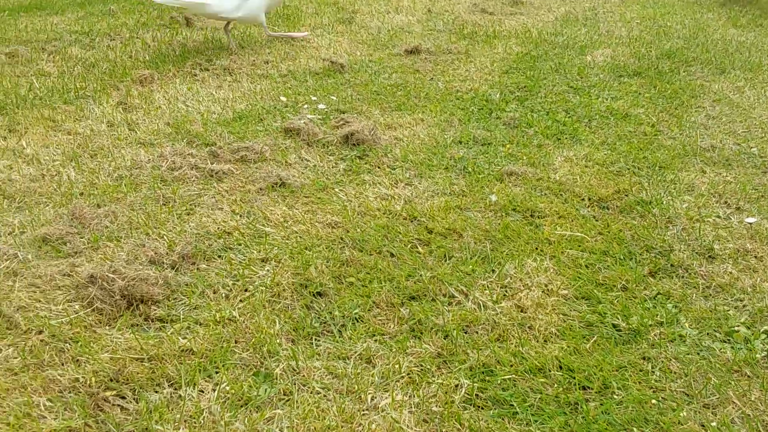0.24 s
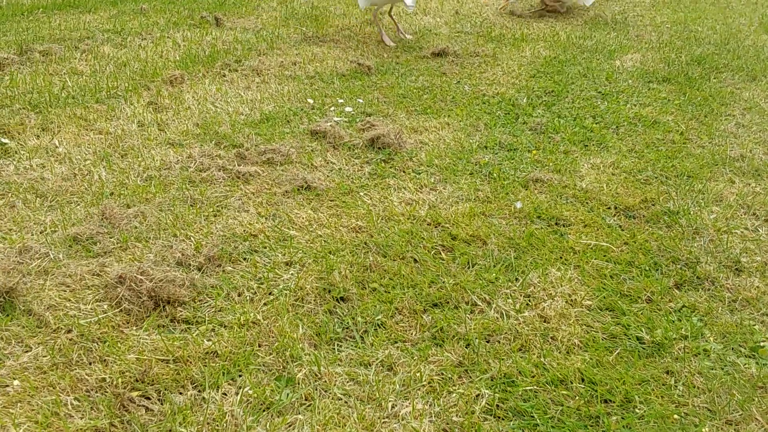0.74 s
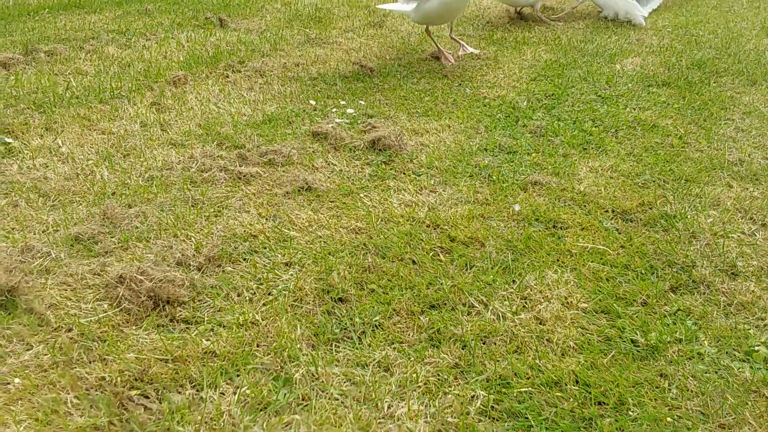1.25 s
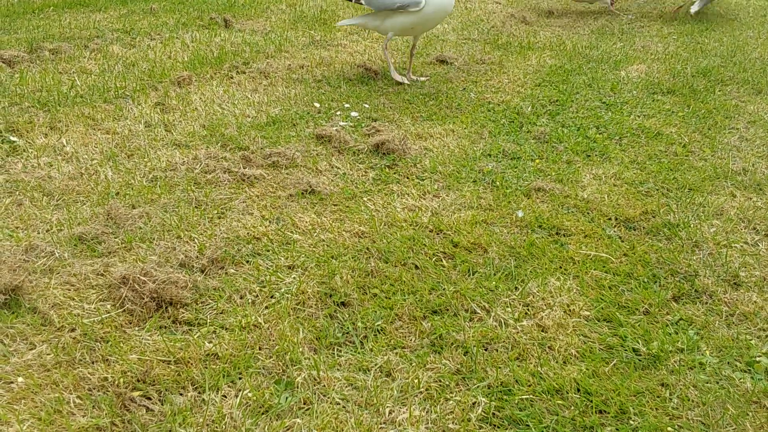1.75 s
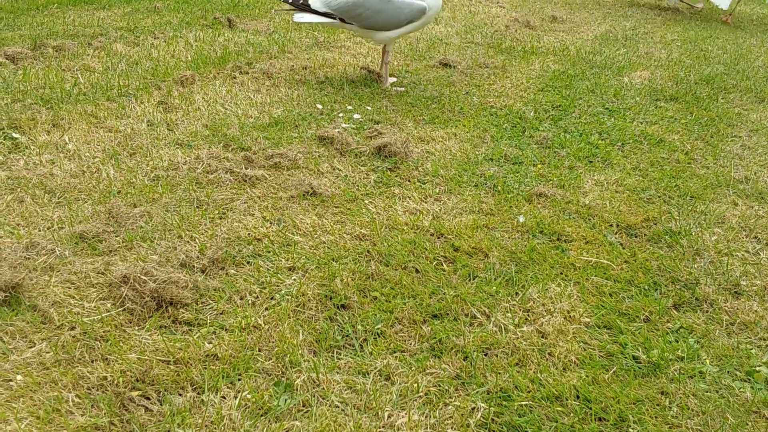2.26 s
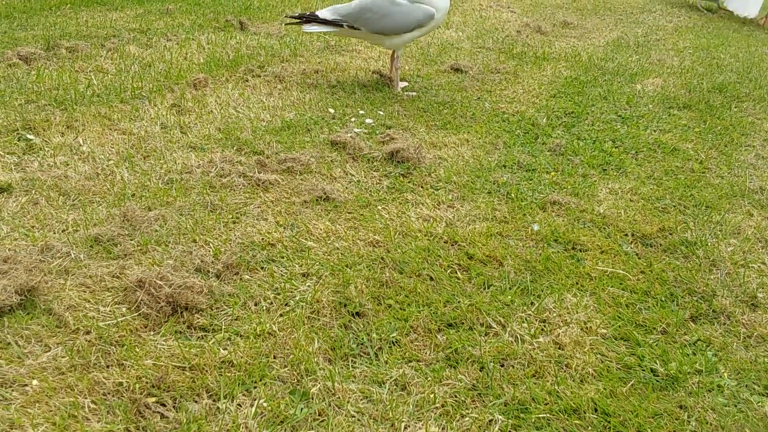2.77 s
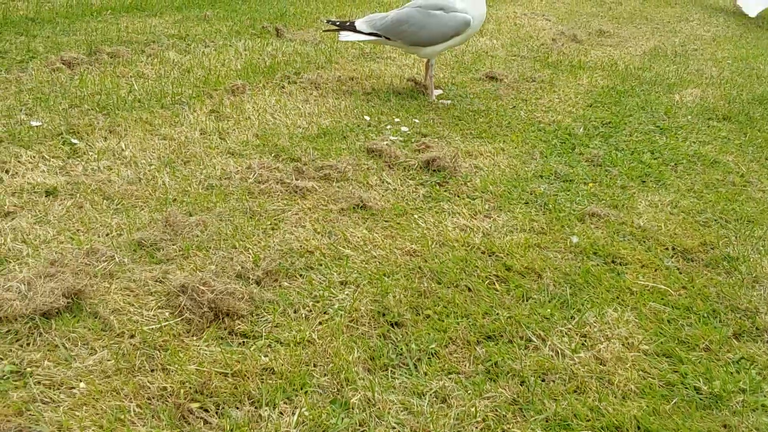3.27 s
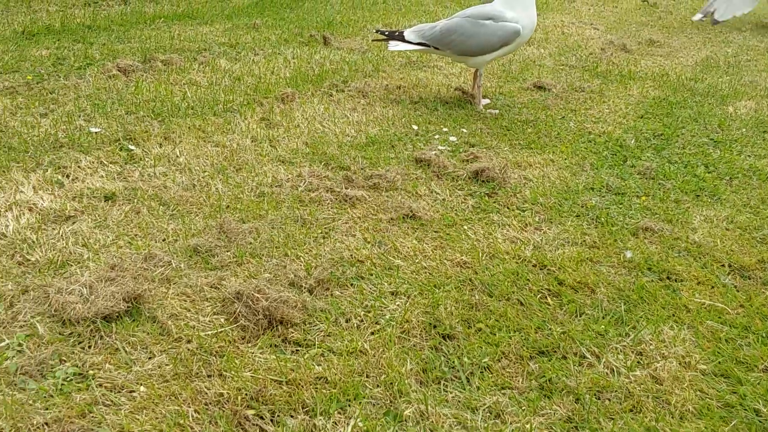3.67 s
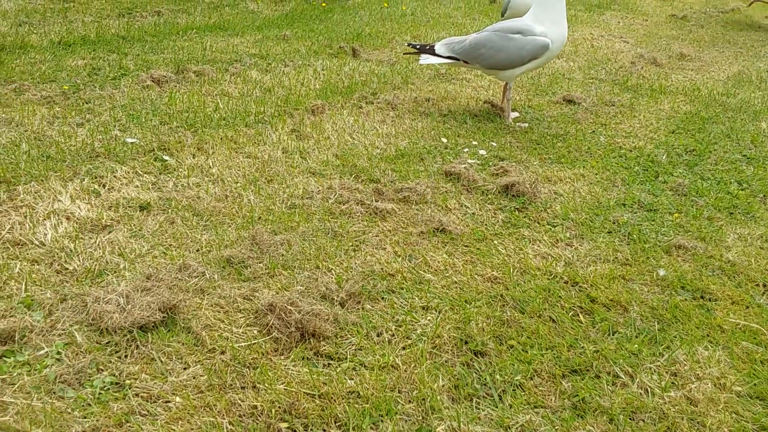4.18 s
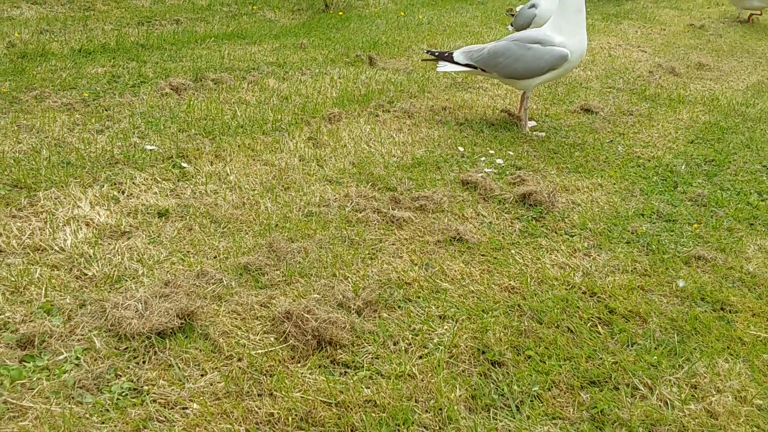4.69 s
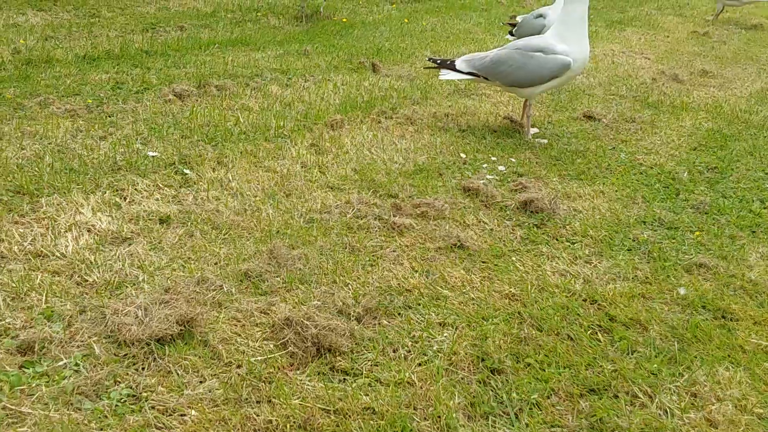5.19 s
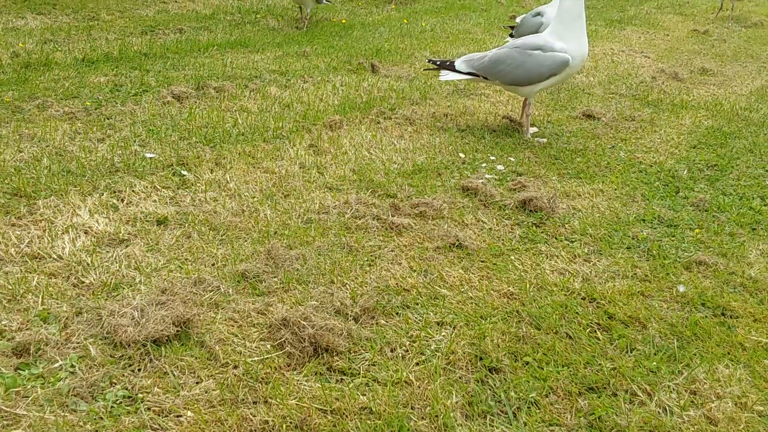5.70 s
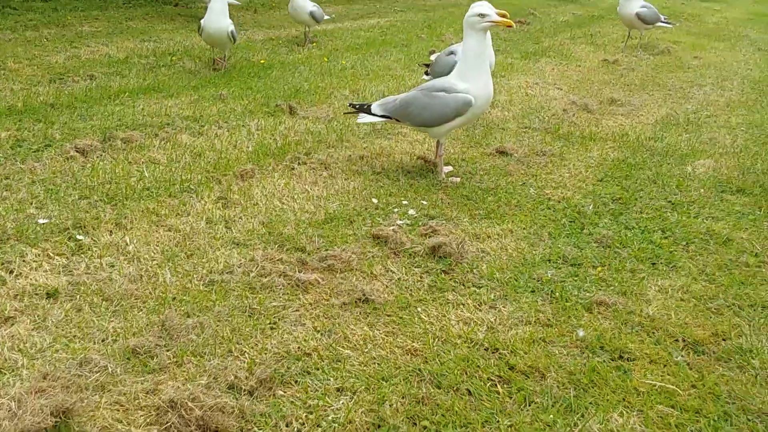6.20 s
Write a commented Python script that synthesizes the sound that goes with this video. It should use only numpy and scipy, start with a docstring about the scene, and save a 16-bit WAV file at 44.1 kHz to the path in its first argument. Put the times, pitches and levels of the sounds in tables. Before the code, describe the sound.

A nearby gull on an open lawn gives five loud, high cries at about 0.6, 1.3, 2.2, 3.5 and 5.2 seconds. Each lasts roughly a third of a second, breaking from a tiny croak into a falling scream with a slight, quick echo. At 0.9 seconds a second gull cuts in with a loud squawk that cracks downward. Softer, low mews come at 0.5 and 1.5 seconds, with brief ones between 2.6 and 3.5. Distant gulls answer around 2.6, 3 and 3.8 seconds. A faint hiss and low, distant rumble lie underneath, with scattered soft handling bumps and rustles, the rustles clearest between 3.2 and 4 seconds. From about 4.3 to 5.2 seconds a gust buffets the microphone with a deep rumble. After the last cry the background falls quieter, and one faint mew comes near 6.3 seconds.

```python
"""A low, distant rumble with soft bumps and rustles, then five loud falling cries from a gull on a lawn.
A second gull cuts in; others mew and answer from farther off, and a gust buffets the microphone late on.
Each voice is a source and a filter: the syrinx makes a harmonic tone, the throat and beak shape it.
Walls throw the cries back, so each glide beats against its own delayed echo."""
import sys
import numpy as np
from scipy import signal
from scipy.fft import rfft, irfft
from scipy.io import wavfile
from scipy.ndimage import uniform_filter1d

SR = 44100
rng = np.random.default_rng(int(sys.argv[2]) if len(sys.argv) > 2 else 0)


def transcribe(u):
    """Save the signal u as a 16-bit wav file named by the first command-line argument.

    u: samples, shape (n,) or (channels, n), limited to [-1, 1]; the rate is SR.
    q: integer samples, one column per channel.
    """
    v = np.clip(np.atleast_2d(u).T, -1, 1)
    q = np.round(v * 32767).astype(np.int16)
    wavfile.write(sys.argv[1], SR, q)


N = 284312
TIME, FREQS = np.arange(N) / SR, np.fft.rfftfreq(N, 1 / SR)
PROGRESS = np.linspace(0, 1, 200)  # from the start of a call to its end

# shading of hiss and rustles at the two microphone ports: (frequency [Hz], left minus right [dB])
HISS_SHADE = [(300, 0), (3000, 0.5), (7500, 7), (10000, -1.5), (13000, -5)]


def amp(db):
    """Amplitude ratio of a level in decibels."""
    return 10 ** (np.asarray(db) / 20)


def unit(x):
    """Normalisation to an rms of one."""
    return x / np.sqrt(np.mean(x ** 2) + 1e-20)


def read(points, hz):
    """Interpolation of a spectrum on a logarithmic frequency axis."""
    f, value = np.transpose(points)
    return np.interp(np.log(hz + 1), np.log(f + 1), value)


def add(mix, s, sound):
    """Superposition: a sound joins the mix at time s."""
    part = mix[max(round(s * SR), 0):][:len(sound)]
    part += sound[:len(part)]


def sides(balance_db):
    """Left and right gains for a level difference between the ports."""
    return amp(np.array([balance_db, -balance_db]) / 2)


def wander(count, rate_hz):
    """Random modulation: noise low-passed at the given rate."""
    f = np.fft.rfftfreq(count, 1 / SR)
    return unit(irfft(rfft(rng.standard_normal(count)) / (1 + (f / rate_hz) ** 2), count))


def noise(colour, correlation):
    """Partial coherence: coloured noise at two ports that share a common part."""
    white = rng.standard_normal((3, N))
    pair = np.sqrt(correlation) * white[2] + np.sqrt(1 - correlation) * white[:2]
    return unit(irfft(rfft(pair) * amp(read(colour, FREQS)), N))


def surging_noise(course, colour, correlation, surge_db, gain_db=3.5):
    """Amplitude modulation: noise surges at random while following a course of level and balance."""
    s, level_db, pan_db = np.transpose(course)
    carrier = noise(colour, correlation)
    carrier /= np.sqrt(uniform_filter1d(carrier ** 2, size=3000) + 1e-9)  # evens out the level
    surges = unit(amp(surge_db * wander(N, 14)))
    fade = np.clip(np.minimum(TIME - s[0], s[-1] - TIME) / 0.03 + 1, 0, 1)
    envelope = fade * amp(gain_db + np.interp(TIME, s, level_db))
    return carrier * surges * envelope * sides(np.interp(TIME, s, pan_db))


def air(flutter_db=1.6, grain_db=1.5):
    """Amplitude-modulated noise: a light, grainy hiss that sinks as the gust passes."""
    # hiss spectrum: (frequency [Hz], gain [dB])
    colour = [(120, -30), (200, -3.5), (414, -10), (554, -6.5), (1070, -17), (2560, -15), (3180, -18),
              (5910, -18), (7620, -16), (9140, -19.5), (12900, -21), (15500, -18)]
    # hiss envelope: (time [s], level [dB])
    envelope = [(0, -52), (4.2, -52.5), (5.2, -55), (5.55, -61.5), (6.18, -65), (6.45, -58.5)]
    hiss = irfft(rfft(noise(colour, correlation=0.05)) * sides(read(HISS_SHADE, FREQS)), N)
    modulation = amp(flutter_db * wander(N, 7.5) + grain_db * wander(N, 400))
    return amp(np.interp(TIME, *np.transpose(envelope))) * unit(hiss * modulation)


def distant_rumble():
    """Coherent noise: a low, distant rumble, alike at both ports, heard before the gust."""
    # course of the rumble: (time [s], relative level [dB], left minus right [dB])
    course = [(0, -55.5, 1), (1.6, -52, 0), (4.2, -49, 0.5)]
    # rumble spectrum: (frequency [Hz], gain [dB])
    colour = [(20, -42.5), (35, -10.5), (60, 2.5), (90, 2.5), (130, -3.5), (200, -7), (350, -26),
              (2000, -74)]
    return surging_noise(course, colour, correlation=0.93, surge_db=2.5)


def gust():
    """Turbulent pressure: a gust buffets each microphone port almost independently."""
    # course of the gust: (time [s], relative level [dB], left minus right [dB])
    course = [(4.22, -47.5, 1), (4.28, -37.5, 13), (4.36, -36.5, 4), (4.42, -25, -8.5), (4.52, -22.5, -1),
              (4.64, -23.5, -2.5), (4.71, -28.5, 10), (4.79, -23.5, -6), (4.96, -24.5, 2.5), (5.12, -37, 1),
              (5.22, -38.5, 10), (5.5, -56, 22.5), (5.68, -70, 14.5), (5.95, -74.5, 15), (6.1, -65.5, 14),
              (6.45, -57.5, 9)]
    # pressure spectrum: (frequency [Hz], gain [dB])
    colour = [(20, -23), (33, -17.5), (50, 1), (80, 0.5), (120, -9), (200, -22), (300, -33.5), (1200, -82)]
    return surging_noise(course, colour, correlation=0.073, surge_db=4.5)


def bumps(gain_db=-4, rise_s=0.002, t60=0.15):
    """Damped impacts: dull handling knocks, bursts of low noise that decay with no ring."""
    # knocks: (time [s], relative level [dB])
    knocks = [(0.104, -40.5), (0.265, -38), (0.463, -44), (.716, -38), (1.659, -33.5), (1.894, -45.5),
              (2.049, -40.5), (2.753, -37), (2.818, -39), (2.964, -37), (3.107, -35), (4.904, -37),
              (5.01, -37), (5.968, -56), (6.018, -52)]
    # knock spectrum: (frequency [Hz], gain [dB])
    colour = [(20, -35), (60, -9.5), (170, 9), (350, 0), (650, 0), (1200, -11.5), (2500, -24.5),
              (16000, -54.5)]
    envelope = np.zeros(N)
    for s, peak_db in knocks:
        age = np.maximum(TIME - s, 0)
        envelope += amp(peak_db - 60 * age / t60) * np.minimum(age / rise_s, 1)
    return amp(gain_db) * envelope * noise(colour, correlation=0.97)


def rustles(grain_db=2.5, rise_s=0.0057, snap_t60=0.036, treble_hz=9000):
    """Friction noise: short, grainy brushing strokes add in power; a few start with a snap."""
    # strokes: (time [s], level [dB], t60 [s], treble lift [dB])
    strokes = [(.262, -48.5, 0.27, -11), (1.622, -46, 0.33, -5), (1.802, -49.5, 0.21, 7),
               (2.039, -50.5, 0.3, 9), (2.77, -53, 0.36, 1), (2.96, -64, 0.38, 15), (3.061, -52.5, 1, -2),
               (3.242, -42, 0.68, -3), (3.457, -35.5, 0.36, -11), (3.773, -37.5, 0.33, -2),
               (3.821, -53, .2, 15), (3.916, -45, 0.36, -0.5), (3.957, -46.5, 0.25, 8.5),
               (4.68, -52.5, 0.65, 8), (4.902, -47.5, 0.31, 0), (5.804, -67, .25, 16)]
    # crisp onsets: (time [s], level [dB])
    snaps = [(0.268, -43.5), (3.244, -35.5), (3.457, -33.5), (4.468, -52)]
    # brushing spectrum: (frequency [Hz], gain [dB])
    colour = [(30, -34.5), (100, -17), (500, 5.5), (1500, -4.5), (3200, 0.5), (5500, -7), (7500, -1.5),
              (9500, -7.5), (13000, -7), (16000, -8.5)]
    body_power, treble_power = np.zeros((2, N))
    for s, stroke_db, t60, lift_db in strokes:
        age = np.maximum(TIME - s, 0)
        decay = amp(stroke_db - 60 * np.maximum(age - rise_s, 0) / t60)
        power = (decay * np.minimum(age / rise_s, 1)) ** 2
        body_power += power
        treble_power += power * amp(lift_db) ** 2
    snap_power = sum((TIME >= s) * amp(db - 60 * abs(TIME - s) / snap_t60) ** 2 for s, db in snaps)
    fizz = irfft(rfft(noise(colour, correlation=0.2)) * sides(read(HISS_SHADE, FREQS)), N)
    fizz = unit(fizz * amp(grain_db * wander(N, 300)))
    body = irfft(rfft(fizz) / (1 + (FREQS / treble_hz) ** 4), N)
    return np.sqrt(body_power + snap_power) * body + np.sqrt(treble_power + snap_power) * (fizz - body)


def reflections(direct, scatter_db, tail_db, scatter_t60=0.11):
    """Convolution with wall echoes, a short scatter off nearby things and a faint open-air tail."""
    # wall echoes: (left delay [s], right delay [s], left gain [dB], right gain [dB])
    echoes = [(.0049, 0.011, -15, -11), (0.0183, 0.016, -23, -19), (0.0309, .0304, -4.5, -9)]
    # reverberation time of the tail: (frequency [Hz], t60 [s])
    tail_t60 = [(1200, 0.54), (3000, 0.59), (14000, 0.085)]
    count = SR * 3 // 4
    taps = rng.standard_normal((2, count)) * (rng.random((2, count)) < 0.08)
    scatter = taps[:, ::-1] * amp(-60 * np.arange(count) / SR / scatter_t60)
    hz, t, spectra = signal.stft(taps, SR, nperseg=256)
    decay = amp(-60 * t / read(tail_t60, hz)[:, None])
    tail = signal.istft(spectra * decay, SR, nperseg=256)[1][:, :count]
    response = (amp(scatter_db) * unit(scatter) + amp(tail_db) * unit(tail)) / np.sqrt(count)
    for left_s, right_s, left_db, right_db in echoes:
        add(response[0], left_s, amp([left_db]))
        add(response[1], right_s, amp([right_db]))
    return signal.fftconvolve(direct[None], response, axes=1)[:, :N]


def propagate(calls, gain_db, pan_db, lag_ms, reflected_db, scatter_db, tail_db):
    """Interference: calls combine with their reflections and reach the left port a little late."""
    # shading of the ports for sound from the right: (frequency [Hz], left minus right [dB])
    shade = [(500, -3.5), (1400, -3.5), (3000, -3.5), (4000, 4.5), (4800, 5.5), (6000, 6), (8000, 4.5),
             (10000, 0.5), (15000, -5.5)]
    direct = np.zeros(N)
    for s, sound in calls:
        add(direct, s, sound)
    pressure = direct + amp(reflected_db) * reflections(direct, scatter_db, tail_db)
    spectrum = rfft(pressure) * sides(read(shade, FREQS) + pan_db)
    spectrum[0] *= np.exp(-2j * np.pi * FREQS * lag_ms / 1000)
    return amp(gain_db) * irfft(spectrum, N)


def call(contour, throat, hiss_db, treble_db=0, jitter=0.031, waver=0.0023, rasp=0.79, flicker_db=2):
    """Source and filter: a syrinx tone, its cycles uneven with roughness, is shaped by the throat."""
    s, *columns = np.transpose(contour)
    t = np.arange(s[0], s[-1], 1 / SR)
    hz, level_db, overtone_db, rough = (np.interp(t, s, c) for c in columns)
    rough, count = np.clip(rough, 0, 1), len(t)
    hz *= 1 + waver * wander(count, 36) + jitter * rough * wander(count, 450)
    phase = 2 * np.pi * np.cumsum(hz) / SR
    harmonic = np.arange(2, 13)[:, None]
    # the upper overtones flicker independently, and weaken when the beak points away
    upper_db = treble_db + flicker_db * np.array([wander(count, 26) for _ in harmonic])
    weight = amp(read(throat, harmonic * hz) + (harmonic > 2) * upper_db) * (harmonic * hz < SR / 2)
    overtones = (weight * np.cos(harmonic * phase)).sum(0) / np.linalg.norm(weight, axis=0)
    # rasp shakes the overtones while the fundamental stays firm
    overtones *= (1 + rough * rasp * wander(count, 400)) / np.sqrt(1 + (rasp * rough) ** 2)
    # period doubling: strong and weak cycles alternate, adding a line an octave down
    subharmonic = amp(-8) * rough * np.cos(phase / 2)
    tone = np.cos(phase) + subharmonic + amp(overtone_db) * overtones
    tone *= np.sqrt(2 / (1 + amp(overtone_db) ** 2))
    # air escapes in a puff with every cycle
    throat_gain = amp(read(throat, np.fft.rfftfreq(count, 1 / SR)))
    hiss = unit(irfft(rfft(rng.standard_normal(count)) * throat_gain, count))
    puffs = amp(hiss_db) * rough * hiss * (1 + np.cos(phase))
    return s[0], amp(level_db) * (tone + puffs) * signal.windows.tukey(count, 0.02)


def arch(s, length_s, first_hz, crest_hz, last_hz, crest, peak_db, overtone_db, rough):
    """Modulation contour of a lesser call: faint and rough at both ends, gliding through three notes."""
    from_crest = np.interp(PROGRESS, [0, crest, 1], [1, 0, 1])
    hz = crest_hz + (np.where(PROGRESS < crest, first_hz, last_hz) - crest_hz) * from_crest ** 1.2
    edge = abs(2 * PROGRESS - 1) ** 2.6
    columns = s + length_s * PROGRESS, hz, peak_db - 14.5 * edge, overtone_db, rough + 0.2 * edge
    return np.column_stack(np.broadcast_arrays(*columns))


def far_gulls():
    """Distant answers: scattered sound is strong relative to the direct path."""
    # cries: (time [s], length [s], first pitch [Hz], crest pitch [Hz], last pitch [Hz],
    # crest position [0-1], relative level [dB], overtones over fundamental [dB], roughness [0-1])
    cries = [(2.609, .26, 1431, 1535, 1358, .28, -39.5, 2, 0.12),
             (2.951, 0.11, 1270, 1310, 1190, .2, -44, -2.5, 0),
             (3.776, .15, 1334, 1432, 1111, .28, -34, -9.5, 0.1),
             (4.6, 0.3, 1444, 1530, 1400, 0.48, -62.5, 1.5, 0.8)]
    # throat and beak response: (frequency [Hz], gain [dB])
    throat = [(900, 16), (2000, 17), (3000, 2.5), (4500, 4), (6000, -8.5), (7500, -24.5), (10000, -33),
              (16000, -45)]
    calls = [call(arch(*row), throat, hiss_db=-25.5) for row in cries]
    return propagate(calls, gain_db=-8, pan_db=-3, lag_ms=0.38,
                     reflected_db=-2.5, scatter_db=4, tail_db=-15.5)


def mewing_gull():
    """Low, breathy mews: a throat resonance near 720 Hz favours the overtones close to it."""
    # mews: (time [s], length [s], first pitch [Hz], crest pitch [Hz], last pitch [Hz],
    # crest position [0-1], relative level [dB], overtones over fundamental [dB], roughness [0-1])
    mews = [(.53, 0.34, 329.3, 390, 355, 0.26, -43.5, 12, .35),
            (1.465, 0.24, 297, 381.3, 260, 0.41, -30.5, 16, .13),
            (2.582, 0.056, 409, 499, 662, 0.43, -31, -3.5, .12),
            (3.035, 0.074, 750.5, 498.7, 390, .38, -37, -3.5, .2),
            (3.441, .085, 415.6, 545.5, 638, .5, -30.5, 0.5, .2),
            (6.2, 0.21, 291.6, 301.7, 335, 0.5, -58.5, 19, .65),
            (6.345, 0.12, 325, 359.7, 335, .6, -43, 24, .08)]
    # throat and beak response: (frequency [Hz], gain [dB])
    throat = [(100, -25), (500, -8), (720, 8.5), (1080, -6.5), (1500, -24.5), (2100, -20.5), (2450, -24.5),
              (2850, -19.5), (3600, -37), (16000, -62.5)]
    calls = [call(arch(*row), throat, hiss_db=-3.5) for row in mews]
    return propagate(calls, gain_db=-3, pan_db=3, lag_ms=0.36,
                     reflected_db=-9.5, scatter_db=1.5, tail_db=-13)


def rival_gull():
    """A register break: the second gull's squawk cracks downward midway."""
    # squawk: (time [s], pitch [Hz], relative level [dB], overtones over fundamental [dB],
    # roughness [0-1])
    contour = [(.843, 1152, -34, 6.5, .9), (.857, 1290, -18, 10.5, 0.57), (.862, 1700, -20.5, 2, 0.47),
               (.876, 1535, -14, 10.5, 0.15), (.915, 1482, -13, 10, 0.04), (.949, 1383, -15.5, -4, 0),
               (.952, 1232, -13, 2, 0.02), (1.051, 1090, -23.5, 1, 0.01), (1.054, 1240, -23, -4, 0.02),
               (1.115, 1104, -30, -14.5, 0.03), (1.14, 831, -48.5, -7, 0.82)]
    # throat and beak response: (frequency [Hz], gain [dB])
    throat = [(900, -26), (2400, 7), (3000, 8), (3600, 4.5), (4600, 2), (5700, -18), (7600, -9),
              (9000, -20), (16000, -33.5)]
    squawk = call(contour, throat, hiss_db=-16, jitter=0.056, flicker_db=4.5)
    return propagate([squawk], gain_db=-3, pan_db=-3, lag_ms=0.15,
                     reflected_db=-3.5, scatter_db=-6.5, tail_db=-16)


def croak(s, lead_s=0.027, overlap_s=0.008, from_hz=410, to_hz=536.9, overtone_db=17, rough=0.22):
    """Onset of oscillation: a low register climbs and swells, then yields to the scream at time s."""
    age = PROGRESS * (lead_s + overlap_s)
    hz = from_hz + (to_hz - from_hz) * np.sin(np.pi / 2 * PROGRESS)
    level_db = -18.5 - 30 * np.exp(-age / 0.0054) - 12 * PROGRESS ** 4
    return np.column_stack(np.broadcast_arrays(s - lead_s + age, hz, level_db, overtone_db, rough))


def scream(s, top_hz, hold_s, fall_s, overtone_db, sag_per_s=1.24):
    """Frequency glide in the high register: the pitch scoops up, holds, drops, sags and collapses."""
    age = PROGRESS * (hold_s + fall_s)
    after_hold = np.maximum(age - hold_s, 0)
    fall = after_hold / fall_s
    voice_break = np.exp(-age / 0.016)
    collapse = fall ** 8.8
    scoop = 0.122 * np.exp(-age / 0.012)
    drop = 0.043 * (1 - np.exp(-after_hold / 0.0125))
    hz = top_hz * (1 - scoop - drop - sag_per_s * after_hold - 0.079 * collapse)
    fundamental_db = -30 + 6 * voice_break
    # the overtones swell quickly and fade all through the fall
    upper_db = overtone_db - 6.5 * np.exp(-age / 0.015) - 30 * fall ** 1.62
    level_db = 20 * np.log10(np.hypot(amp(fundamental_db), amp(upper_db))) - 9 * collapse
    rough = 0.025 + 0.23 * voice_break + 0.26 * collapse
    return np.column_stack([s + age, hz, level_db, upper_db - fundamental_db, rough])


def near_gull():
    """Two vocal registers: each cry breaks up from a croak into a scream and ends in a faint catch."""
    # cries: (time of the break [s], top pitch [Hz], hold [s], fall [s], relative overtone level [dB],
    # treble change as the beak turns aside [dB])
    cries = [(0.618, 1598, 0.08, 0.19, -11.5, -1.5), (1.306, 1601, 0.061, .2, -14, -1),
             (2.246, 1581, .059, 0.21, -12.5, -1), (3.520, 1585, .059, .19, -11.5, -1),
             (5.176, 1639, 0.1, 0.21, -14, -5)]
    # throat and beak response in each register: (frequency [Hz], gain [dB])
    croak_throat = [(150, -34.5), (500, -12), (800, 6), (1080, 6), (1500, -16.5), (2000, -19), (2900, -8.5),
                    (4200, -14), (5500, -25.5), (9000, -33), (16000, -50)]
    scream_throat = [(200, -24.5), (900, 7.5), (1900, -19.5), (2400, 3), (3100, 1), (3700, -5), (4600, -8),
                     (5300, -20.5), (6300, -23), (7500, -28.5), (9000, -31.5), (12000, -38), (16000, -51.5)]
    calls = []
    for s, top_hz, hold_s, fall_s, overtone_db, treble_db in cries:
        glide = scream(s, top_hz, hold_s, fall_s, overtone_db)
        catch = arch(s + hold_s + fall_s - 0.014, length_s=0.0019, first_hz=449.5, crest_hz=390,
                     last_hz=340, crest=0.6, peak_db=-37.5, overtone_db=13.5, rough=1.1)
        calls.append(call(croak(s), croak_throat, hiss_db=-13, jitter=0.12))
        calls.append(call(glide, scream_throat, hiss_db=-23.5, treble_db=treble_db,
                          jitter=0.066, waver=0.0035, rasp=0.48, flicker_db=3))
        calls.append(call(catch, croak_throat, hiss_db=-6.5))
    return propagate(calls, gain_db=-4, pan_db=0, lag_ms=0.5073,
                     reflected_db=2, scatter_db=-6, tail_db=-26.5)


def scene():
    """Superposition of hiss, distant rumble, a gust, small handling sounds and four gull voices."""
    background = air() + distant_rumble() + gust() + bumps() + rustles()
    return background + far_gulls() + mewing_gull() + rival_gull() + near_gull()


def record(dry):
    """Band limiting: a steep low-pass filter at 15.9 kHz."""
    low_pass = signal.firwin(511, 15900, window=("kaiser", 9), fs=SR)
    return signal.oaconvolve(dry, low_pass[None], "same")


dry = scene()
out = record(dry)
transcribe(out)
```